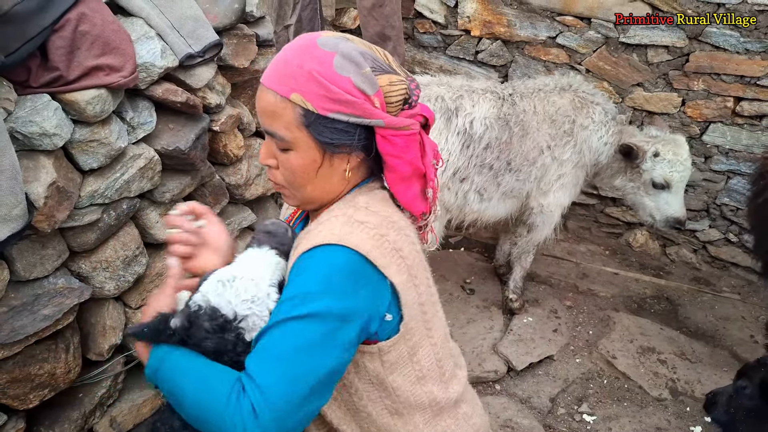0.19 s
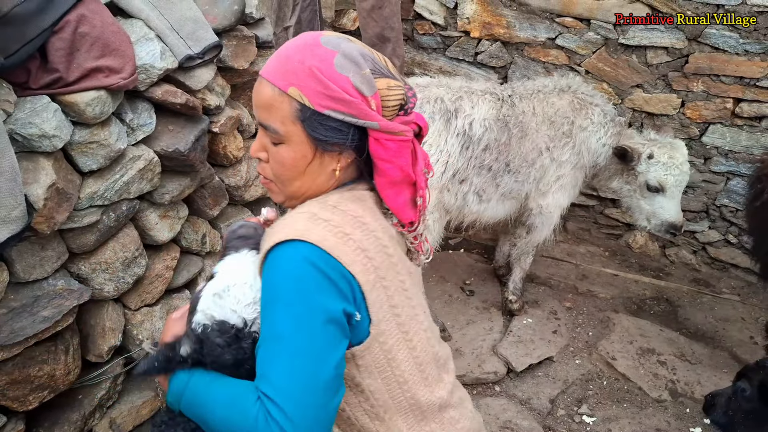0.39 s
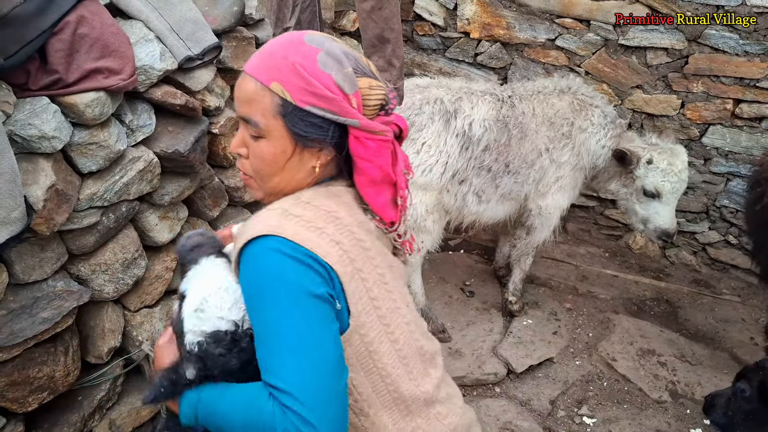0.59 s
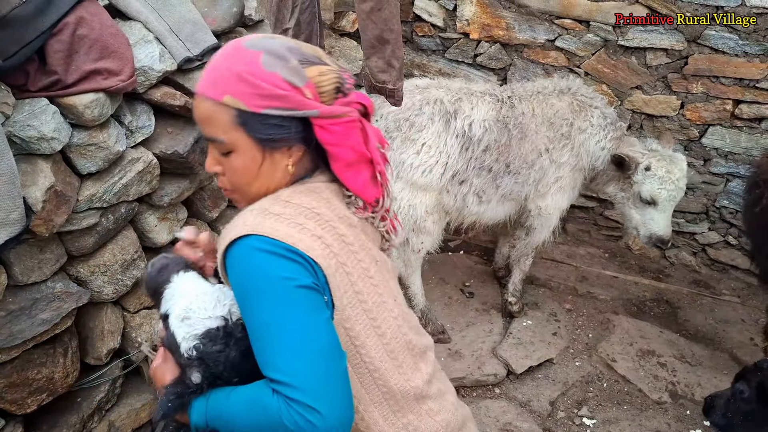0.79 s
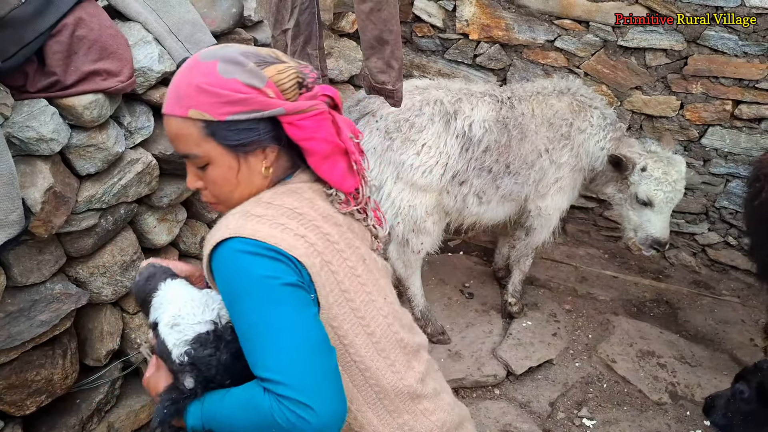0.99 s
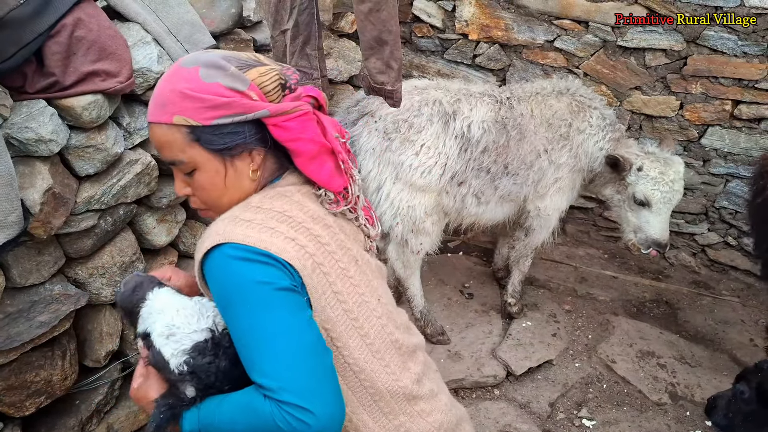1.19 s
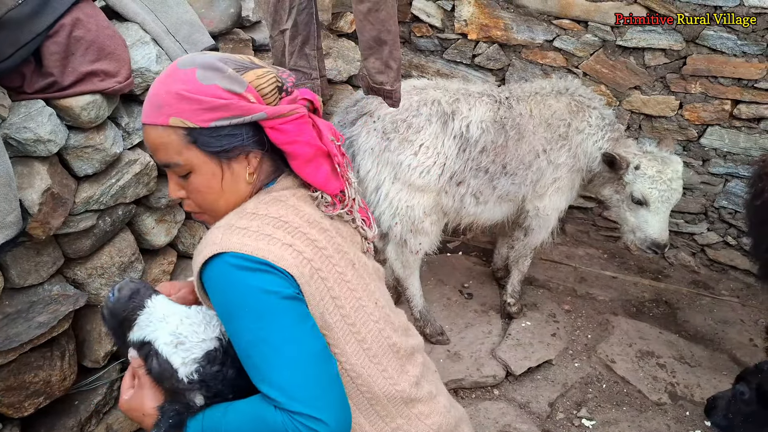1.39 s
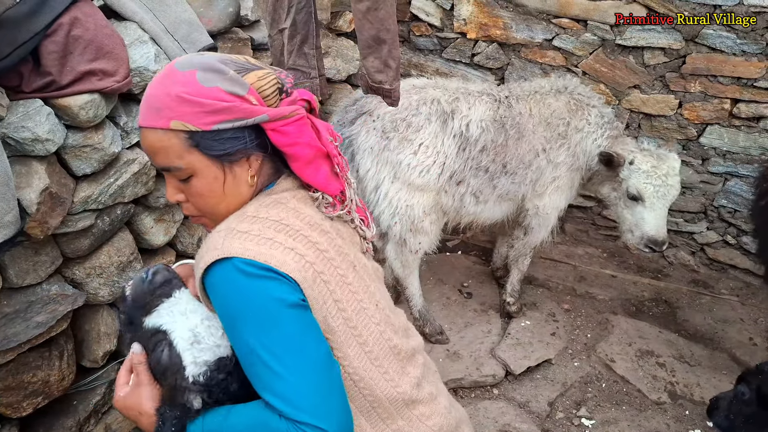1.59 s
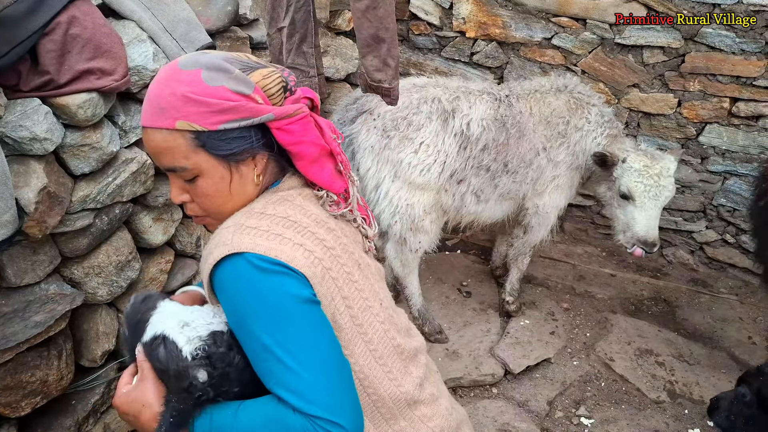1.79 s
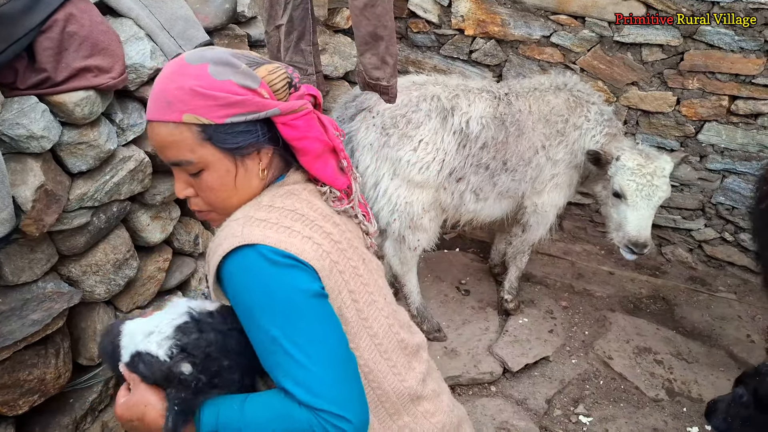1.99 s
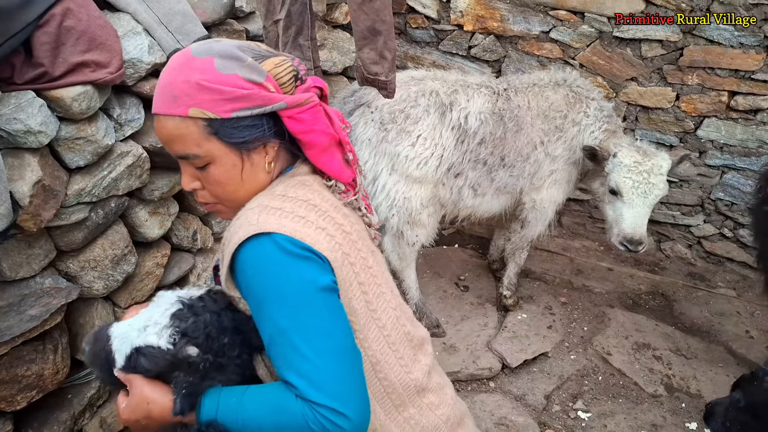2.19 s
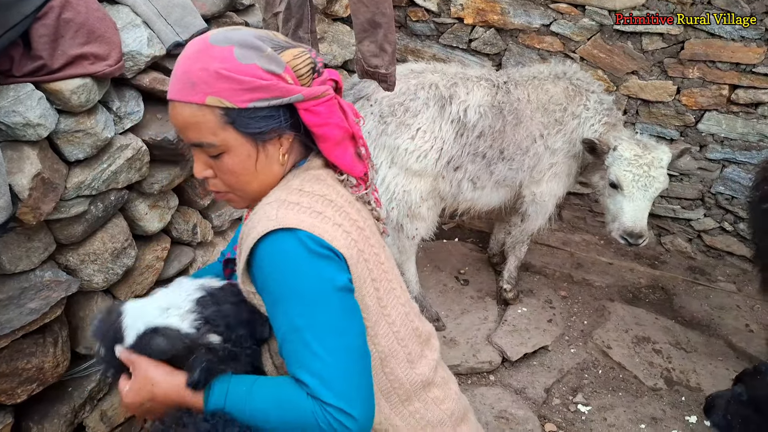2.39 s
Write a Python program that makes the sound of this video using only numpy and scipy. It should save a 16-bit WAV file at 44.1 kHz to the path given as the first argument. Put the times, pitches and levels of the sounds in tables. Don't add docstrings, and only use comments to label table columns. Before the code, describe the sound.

One brief, low calf grunt with a snorting breath, then faint wool rustle and a hoof tap

```python
import sys
import numpy as np
from scipy import signal
from scipy.fft import rfft, irfft, next_fast_len
from scipy.io import wavfile
from scipy.ndimage import uniform_filter1d, map_coordinates

SR = 44100
rng = np.random.default_rng(int(sys.argv[2]) if len(sys.argv) > 2 else 0)


def log_audio(samples):
    frames = np.atleast_2d(samples).T
    limited = np.clip(frames, -1, 1)
    pcm = np.round(limited * 32767).astype(np.int16)
    wavfile.write(sys.argv[1], SR, pcm)


def to_linear_factor(level_db):
    exponent = np.asarray(level_db, float) / 20
    return 10 ** exponent


N = 110250
TOP_HZ = 15850
SIDES = np.array([[.5], [-.5]])

# f/Hz, left-right level/dB
PORT_LEAN = [(60, 1.5), (400, -0.5), (1300, 0), (2400, -6), (3500, -5), (5000, -1.5), (8000, 2),
             (10000, 6.5), (12000, 4.5), (15000, 2)]


def unit(x):
    return x / np.sqrt(np.mean(x ** 2) + 1e-20)


def along(points, hz):
    f, v = np.transpose(points)
    return np.interp(np.log(hz + 1), np.log(f + 1), v)


def curves(rows):
    s, *cols = np.transpose(rows)
    return [np.interp(np.arange(N) / SR, s, c) for c in cols]


def wobble(rate):
    return map_coordinates(rng.standard_normal(400), [np.arange(N) * rate / SR])


def filtered(x, response):
    m = next_fast_len(N + SR // 2)
    out = x[..., :-513:-1] * np.linspace(1, 0, num=512)
    spectrum = rfft(np.concatenate([x, out], axis=-1), m)
    return irfft(spectrum * response(np.fft.rfftfreq(m, 1 / SR)), m)[..., :N]


def tube(peaks):
    return lambda f: sum(to_linear_factor(db) * 1j * f * w / (c * c - f * f + 1j * f * w) for c, w, db in peaks)


def ports(lean, lead=None):
    # f/Hz, phase/rad
    usual_lead = [(0, 0), (260, .4), (780, 1.2), (1100, 3.2), (1640, 3.9), (2150, 6.4), (16000, 51.)]
    hz_knots, phase_knots = np.transpose(usual_lead if lead is None else lead)

    def response(hz):
        phase = np.exp(1j * SIDES * np.interp(hz, hz_knots, phase_knots))
        return to_linear_factor(SIDES * along(lean, hz)) * phase * (hz < TOP_HZ)
    return response


def rush(spectrum, alike, patchy_db):
    z = signal.stft(rng.standard_normal((2, N)), nperseg=512)[2]
    field = uniform_filter1d(rng.standard_normal(z.shape[1:]), 5, 0)
    field = uniform_filter1d(field, 6, 1)
    pair = signal.istft(z * to_linear_factor(patchy_db * unit(field)), nperseg=512)[1][:, :N]

    def mid_side(hz):
        turn = np.arccos(np.clip(along(alike, hz), -1, 1)) / 2
        return to_linear_factor(along(spectrum, hz)) * [np.cos(turn), np.sin(turn)]
    mid, side = filtered(pair, mid_side)
    return unit(np.array([mid + side, mid - side]))


def stream():
    # t/s, level/dB
    strength = [(0, -35), (.2, -33.5), (.4, -32.5), (.5, -37.5), (.65, -33), (.9, -37), (1, -35),
                (1.22, -35), (1.29, -38.5), (1.42, -34.5), (1.55, -36.5), (1.7, -33.5), (1.85, -35),
                (2.02, -32.5), (2.2, -33), (2.33, -34), (2.42, -34), (2.5, -28.5)]
    # f/Hz, density level/dB per Hz
    roar_spectrum = [(25, -43), (60, -8), (90, -3), (230, -2.5), (430, -6), (600, -15), (1000, -23),
                     (2500, -51.5)]
    fizz_spectrum = [(400, -14.5), (900, -7), (1400, -5.5), (2300, -11), (4200, -17.5), (7000, -25.5),
                     (10000, -34), (15800, -60)]
    # f/Hz, likeness
    likeness = [(60, .99), (250, .97), (500, .8), (850, .2), (1450, .65), (1900, .28), (2400, .3),
                (4000, .05)]
    strength_db, = curves(strength)
    lumps = to_linear_factor(0.53 * wobble(39.74) + wobble(9.34))
    roar = to_linear_factor(strength_db + 1) * unit(lumps * rush(roar_spectrum, likeness, patchy_db=1.0))
    swing_db = .3 * (strength_db - strength_db.mean())
    fizz_db = -49 + swing_db + 0.51 * wobble(12.61)
    fizz = to_linear_factor(fizz_db) * rush(fizz_spectrum, likeness, patchy_db=0.1)
    return filtered(roar + fizz, ports(PORT_LEAN))


def rustle():
    # centre t/s, length/s, level/dB, left-right level/dB
    strokes = [(0.085, 0.16, -55.5, -1.5), (0.633, 0.033, -63, 10), (0.744, 0.1, -54, -1),
               (0.832, 0.061, -51.5, 1), (0.883, 0.06, -51.5, 0), (1.052, 0.025, -61, 9),
               (0.214, 0.063, -54, 0), (0.483, 0.089, -56, 4), (1.342, .012, -56, 7), (1.563, .03, -63, 3),
               (1.725, 0.014, -62, 0), (1.644, 0.098, -47, 0), (1.787, 0.095, -57.5, 3),
               (1.908, 0.12, -56.5, -3), (1.98, 0.044, -63, 15), (2.068, 0.11, -87, -26),
               (2.275, .02, -63, -5)]
    # f/Hz, density level/dB per Hz
    wool_spectrum = [(1500, 1), (3000, -1), (5000, 1), (8000, -4.5), (10500, -8), (13000, -4), (15800, -14)]
    t = np.arange(N) / SR
    swell = sum(to_linear_factor(db + pan * SIDES) * np.exp(-(2 * (t - s) / length) ** 2)
                for s, length, db, pan in strokes)
    grains = to_linear_factor(1.4 * wobble(140))
    return filtered(swell * grains * rush(wool_spectrum, [(3000, 0.034)], patchy_db=1.5), ports(PORT_LEAN))


def grunt():
    # t/s, rate/Hz
    flap_rate = [(.2383, 44.4), (.283, 44.4), (.295, 48), (.313, 55), (.333, 51), (.35, 50), (.41, 50),
                 (.43, 43), (.462, 30)]
    # t/s, flap level/dB, ring level/dB, hum level/dB, breath level/dB
    effort = [(.222, -81, -60, -52, -41), (.24, -46, -38, -28, -40), (.262, -17, -28, -15.5, -37),
              (.285, -13.5, -8, -12.5, -35), (.313, -20, -16, -11.5, -28), (.324, -24.5, -27, -23, -39),
              (.343, -23, -19.5, -24.5, -32), (.412, -38, -19, -38.5, -32.5), (.445, -70, -45, -43, -52)]
    # t/s, rate/Hz
    flutter_rate = [(.236, 66), (.285, 66), (.3765, 39), (.415, 67), (.462, 64)]
    # t/s, peak level/dB
    flutter_level = [(.232, -50), (.255, -25), (.31, -25), (.345, -28), (.4, -38), (.44, -27), (.465, -55)]
    # multiple of the flap rate, level/dB, phase/turns
    partials = [(2, 0, -0.13), (3, -9, -.2)]
    # f/Hz, width/Hz, level/dB
    chest_modes = [(317, 260, -3), (449, 84, 1.5), (822.5, 31, 3.5)]
    nose_modes = [(380, 54, -13), (1080, 360, -1), (1650, 44, -2), (1920, 334, 3.5), (2174, 117, -5),
                  (2400, 100, -14.5), (3416, 100, -5), (3880, 34, -21.5), (4400, 120, -10),
                  (5000, 140, -9.5), (5770, 120, -16), (6700, 73, -27), (7180, 59, -12), (14500, 610, -14)]
    main_mode = [(1977, 98, 28)]
    # f/Hz, width/Hz, level over the hiss/dB
    whistles = [(3460, 110, 8), (3820, 100, 4), (5150, 130, 8), (7170, 130, 8)]
    # f/Hz, width/Hz
    sinuses = [(4420, 170), (4870, 200), (6560, 120)]
    # f/Hz, density level/dB per Hz
    snort_spectrum = [(1500, -0.5), (2500, -6.5), (5000, -15.5), (9000, -16.5), (12000, -16), (14500, -11),
                      (15800, -37)]
    # f/Hz, left-right level/dB
    grunt_lean = [(60, 1.5), (450, 1.5), (850, -5), (1180, 6), (1950, -8), (2450, 2), (3420, -9), (3850, 2),
                  (5170, -6), (7200, 3), (15000, 4.5)]
    # f/Hz, phase/rad
    grunt_lead = [(0, 0), (260, .4), (600, .75), (780, 1.3), (960, 2.8), (1640, 3.3), (1980, 4.6),
                  (2150, 6.5), (16000, 51.)]

    t = np.arange(N) / SR
    start, stop = flap_rate[0][0], flap_rate[-1][0]
    rate, = curves(flap_rate)
    flap_db, ring_db, hum_db, breath_db = curves(effort)
    cycle = np.cumsum(rate * ((t >= start) & (t < stop))) / SR
    since = cycle % 1 / rate
    fade = np.clip((stop - .008 - t) / .01, 0, 1) * np.clip((t - start) / .004, 0, 1)

    flaps = np.diff(np.ceil(cycle), prepend=0)
    thump = filtered(-flaps * to_linear_factor(flap_db), lambda f: 80 * tube(chest_modes)(f) / (1 + 1j * f / 1200) ** 3)
    rebounds = np.diff(np.ceil(cycle + .5), prepend=1) * (t > .315) * to_linear_factor(-4)
    ring = filtered((flaps - rebounds) * to_linear_factor(ring_db),
                    lambda f: tube(main_mode)(f) * tube([(2000, 500, 0)])(f))

    tones = sum(to_linear_factor(db) * np.sin(2 * np.pi * (k * cycle + turns)) for k, db, turns in partials)
    hum = fade * to_linear_factor(hum_db) * tones
    beat = np.cumsum(curves(flutter_rate)[0] * (t >= flutter_rate[0][0])) / SR
    flutter = -fade * to_linear_factor(curves(flutter_level)[0]) * np.cos(2 * np.pi * beat)

    puff_s, puff_rise_s = 0.0097, 0.0013
    puffs = np.exp(-since / puff_s) * (1 - np.exp(-since / puff_rise_s))
    air = to_linear_factor(breath_db) * (0.14 + puffs) * to_linear_factor(3.5 * wobble(90)) * rng.standard_normal(N)
    nose = filtered(to_linear_factor(10) * air, lambda f: tube(nose_modes)(f) * np.abs(tube(nose_modes)(f)) ** .5)

    blow_s, half_length_s = .338, .054
    blow = to_linear_factor(-34.5) * np.exp(-((t - blow_s) / half_length_s) ** 2) * (0.65 + puffs)
    hiss = blow * rush(snort_spectrum, [(3000, 0.35), (9000, 0.085)], patchy_db=3.0)
    hiss = filtered(hiss, lambda f: 1 + tube(whistles)(f))

    gaps = lambda f: np.prod([1 - tube([(c, w, 0)])(f) for c, w in sinuses], axis=0)
    breath = filtered(nose + hiss, gaps)
    return filtered(thump + ring + hum + flutter + breath, ports(grunt_lean, grunt_lead))


def ticks(rows):
    lag_s, rise_share = 0.00066, .04
    out, t = np.zeros((2, N + SR)), np.arange(SR // 8) / SR
    for s, db, hz, t60, pan in rows:
        rise = 1 - np.exp(-t / (rise_share * t60))
        rough = 1 + .12 * rng.standard_normal(len(t))
        ring = np.sin(2 * np.pi * hz * t) * to_linear_factor(-60 * t / t60) * rise * rough
        out[0, round(s * SR):][:len(t)] += to_linear_factor(db + pan / 2) * ring
        out[1, round((s + lag_s) * SR):][:len(t)] += to_linear_factor(db - pan / 2) * ring
    return out[:, :N]


def nostril_rings():
    # t/s, peak level/dB, f/Hz, t60/s, left-right level/dB
    rings = [(.2605, -36.5, 4380, 0.047, -6), (.263, -44, 9200, .025, 11), (0.284, -43, 7250, 0.027, 6),
             (.304, -31, 3400, .025, -2), (.305, -34, 5180, 0.017, -12), (.342, -27, 3870, 0.029, 3),
             (0.26, -31, 1140, 0.027, 11), (.284, -34.5, 2590, .025, 0), (.305, -37, 6300, .02, -9),
             (.322, -41, 7100, .025, 8), (.343, -34, 6920, .03, 5), (.343, -32, 5280, 0.032, 1)]
    return filtered(ticks(rings), lambda f: f < TOP_HZ)


def bead_cracks():
    # t/s, peak level/dB, f/Hz, t60/s, left-right level/dB
    cracks = [
        (0.6, -33.5, 12000, 0.0014, 14),
        (.5425, -38, 14700, .002, 14),
    ]
    return ticks(cracks)


def beads_and_hoof():
    # t/s, peak level/dB, f/Hz, t60/s, left-right level/dB
    taps = [(.545, -56, 12900, 0.014, 13), (1.342, -58, 12500, .003, 4.5), (1.506, -38, 1770, 0.024, -1),
            (1.861, -58, 13700, .05, -15), (1.861, -52, 14100, 0.053, -1), (1.902, -59, 11500, .04, -2.5),
            (1.935, -77, 14100, .05, 7), (2.04, -59, 14900, .03, -10), (2.062, -49, 3170, 0.035, -12),
            (2.062, -48, 4800, .025, -13), (2.065, -49, 3940, .025, -3), (2.065, -32, 1830, 0.052, -15),
            (2.07, -41, 1590, 0.044, -5), (2.069, -46, 5940, .015, 0), (2.077, -47, 1890, 0.044, -14),
            (1.78, -64, 14300, .04, -14.5), (2.275, -72, 14200, .015, -22)]
    return filtered(ticks(taps), lambda f: f < TOP_HZ)


def scuff():
    # t/s, length/s, level/dB
    presses = [
        (2.062, 0.022, -41),
        (2.08, .02, -59),
    ]
    # f/Hz, density level/dB per Hz
    grit_spectrum = [(700, -30), (1500, -1), (2500, 6), (4500, -6), (7000, -15.5), (15000, -26)]
    t = np.arange(N) / SR
    press = sum(to_linear_factor(db) * (t > s) * np.exp(-np.abs(t - s) / length) for s, length, db in presses)
    crunch = to_linear_factor(4.0 * wobble(130)) * rush(grit_spectrum, [(3000, 0.32)], patchy_db=-2.5)
    return filtered(press * crunch, ports([(1000, 1), (8000, 0)]))


def pen(x):
    # f/Hz, t60/s
    decay = [(200, .15), (2000, .12), (10000, .07)]
    hz, t, z = signal.stft(rng.standard_normal((2, SR // 2)), SR, nperseg=256)
    tail = signal.istft(z * to_linear_factor(-60 * t / along(decay, hz)[:, None]), SR, nperseg=256)[1]
    tail = tail / np.linalg.norm(tail[0])
    late = np.pad(x, ((0, 0), (300, 0)))
    return signal.fftconvolve(late, tail, axes=1)[:, :N]


def scene():
    near = grunt() + nostril_rings() + bead_cracks() + beads_and_hoof() + scuff()
    walls = pen(filtered(near, lambda f: (1j * f / (400 + 1j * f)) ** 2))
    return near + to_linear_factor(-13) * walls + stream() + rustle()


def band_limit(x):
    return signal.sosfilt(signal.butter(12, 16650, fs=SR, output="sos"), x)


def record(dry):
    close = np.sin(np.pi / 2 * np.clip(np.arange(N, 0, -1) / (.005 * SR), 0, 1)) ** 2
    return band_limit(dry * close)


dry = scene()
out = record(dry)
log_audio(out)
```